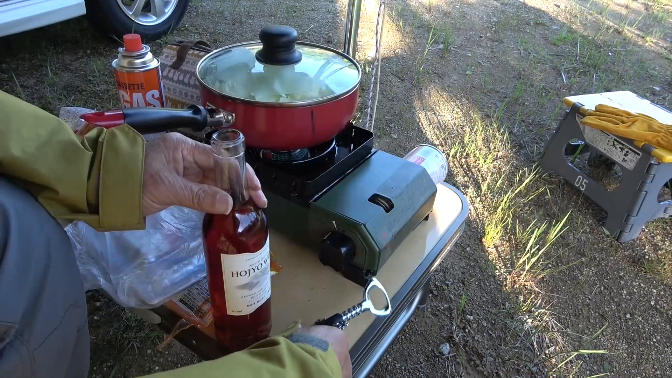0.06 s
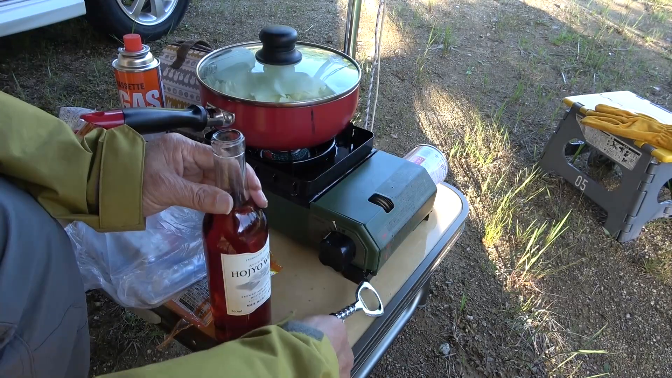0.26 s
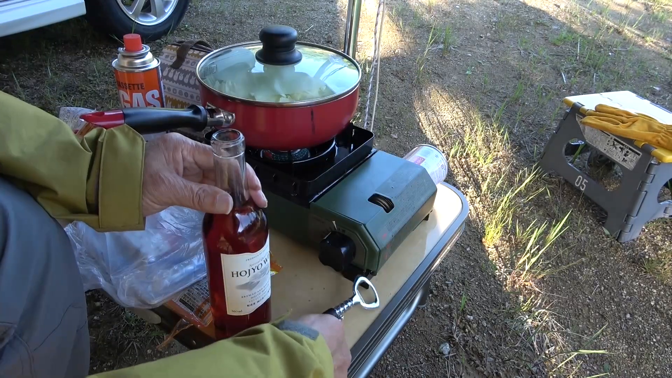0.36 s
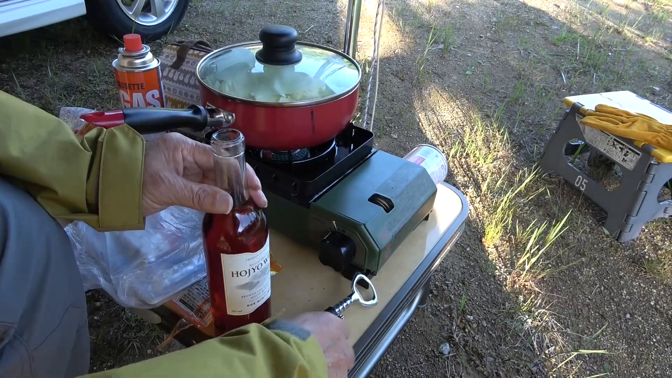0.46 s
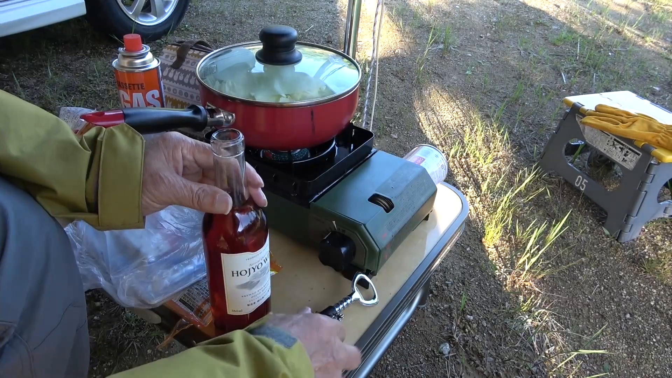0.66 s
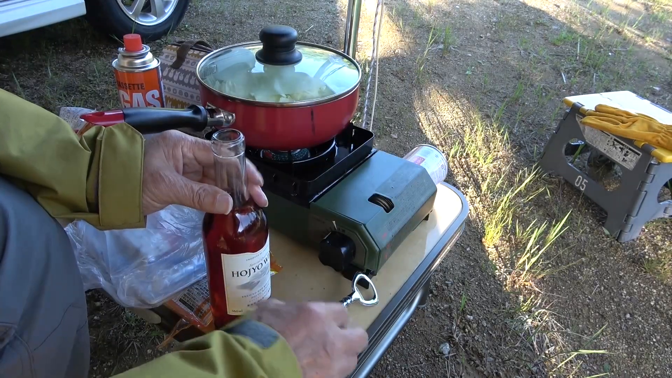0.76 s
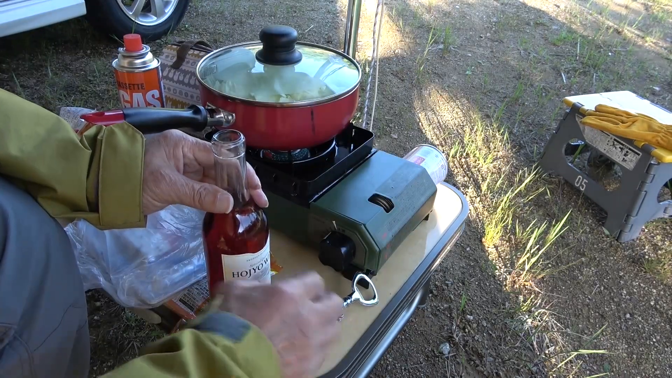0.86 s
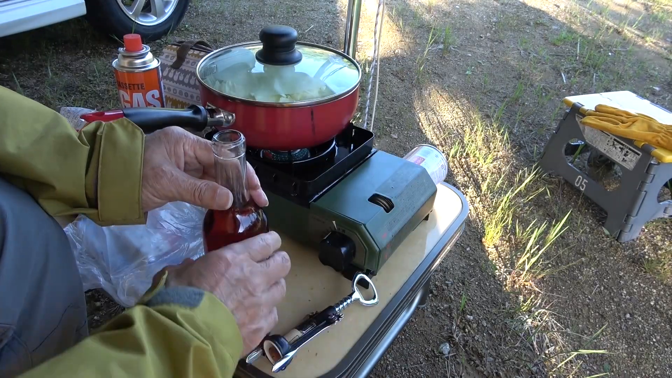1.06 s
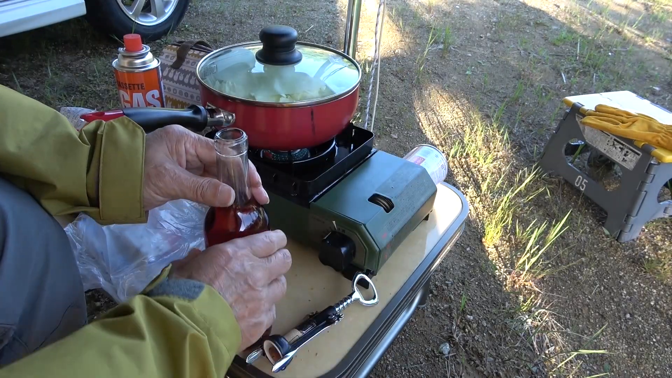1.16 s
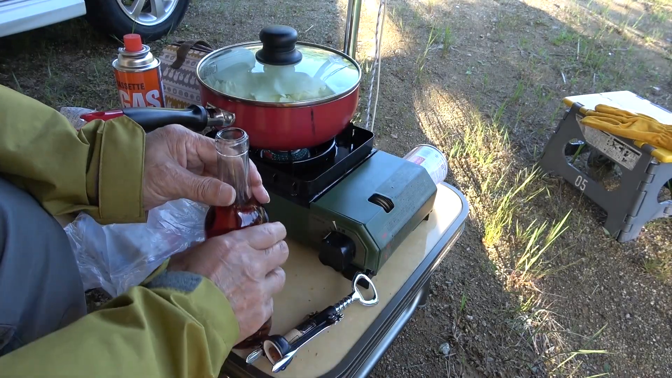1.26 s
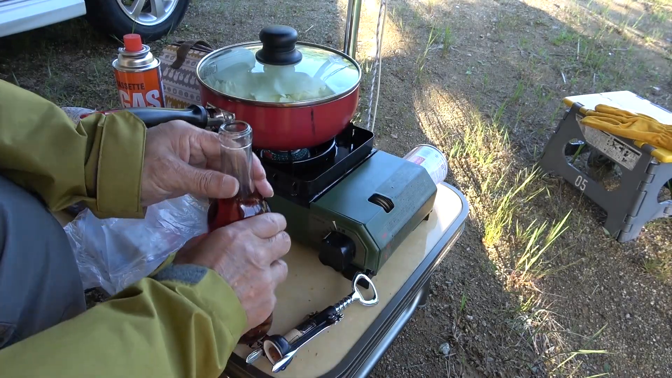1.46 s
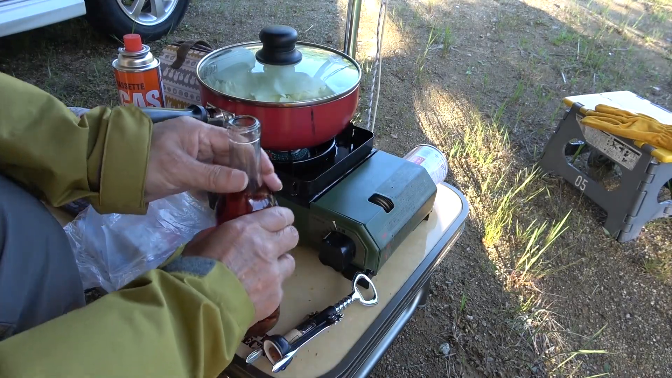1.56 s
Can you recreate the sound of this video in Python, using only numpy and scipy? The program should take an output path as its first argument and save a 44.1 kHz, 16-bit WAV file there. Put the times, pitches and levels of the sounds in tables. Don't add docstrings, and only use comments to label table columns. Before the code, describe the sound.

A steel corkscrew clatters onto a light camp table outdoors, bouncing and scraping to rest.

```python
import sys
import numpy as np
from scipy import signal
from scipy.fft import rfft, irfft
from scipy.io import wavfile
from scipy.ndimage import uniform_filter1d

SR = 44100
rng = np.random.default_rng(int(sys.argv[2]) if len(sys.argv) > 2 else 0)


def master_out(mix):
    frames = np.transpose(np.atleast_2d(mix))
    ceiling = np.clip(frames, -1, 1)
    pcm = np.round(ceiling * 32767).astype(np.int16)
    wavfile.write(sys.argv[1], SR, pcm)


def convert_level_to_amplitude(level_db):
    exponent = np.asarray(level_db, float) / 20
    return 10 ** exponent


N = 70560
t = np.arange(N) / SR


def unit(x):
    return x / np.sqrt(np.mean(x ** 2))


def read(table, hz):
    table = np.array(table)
    return np.interp(np.log(hz + 1), np.log(table[:, 0]), table[:, 1])


def colour(x, table, share=1):
    size = x.shape[-1]
    hz = np.arange(size // 2 + 1) * SR / size
    return irfft(rfft(x) * convert_level_to_amplitude(share * read(table, hz)), size)


def band(x, hz, width):
    return signal.lfilter(*signal.iirpeak(min(hz, .45 * SR), hz / width, fs=SR), x)


def fall(age, t60):
    return (age >= 0) * np.exp(-np.log(1000) * np.maximum(age, 0) / t60)


def swell_in(age, rise_s):
    return (1 - np.exp(-np.maximum(age, 0) / rise_s)) ** 2


def walk(rate, size=N):
    k = int(SR / rate)
    steps = np.repeat(rng.standard_normal(size // k + 1), k)
    return unit(uniform_filter1d(uniform_filter1d(steps, k), k)[:size])


# pitch_hz, level_db
AIR_PAN = [(60, .5), (200, 5.5), (450, 5), (800, 3), (2400, 4), (4500, 8), (7000, 3), (11000, 2)]
KNOCK_PAN = [(60, 1), (250, 3), (1300, 2), (2400, 1), (4400, 4.5), (6500, 0.5), (8100, 1), (11000, 0.5)]


def ports(mid, side, pan):
    return np.array([colour(mid + side, pan, .5), colour(mid - side, pan, -.5)])


# pitch_hz, level_db
AIR = [(20, -15), (130, -1.5), (330, 2.5), (480, -2), (650, -10.5), (1700, -21.5), (7500, -30),
       (14500, -33)]
AIR_SIDE = [(20, -36), (150, -22), (400, -19), (1100, -12), (4600, -36), (6500, -11), (10800, -18),
            (12000, -28)]
# pitch_hz, width_hz, level_db
WHINE = [(8300, 240, -67.5), (9400, 200, -76), (11600, 200, -78), (12700, 200, -77)]


def air():
    flicker_db, swell_db, hiss_db = 1.3, .5, .24
    air_db, side_db = -44.5, -65
    mid, swell = colour(rng.standard_normal(N), AIR), walk(2.0)
    low = signal.lfilter(*signal.butter(2, 700, fs=SR), mid)
    hum = low * convert_level_to_amplitude(flicker_db * walk(14.3) + swell_db * swell)
    hiss = (mid - low) * convert_level_to_amplitude(hiss_db * walk(3.7))
    mid = convert_level_to_amplitude(air_db) * unit(hum + hiss)
    for hz, width, db in WHINE:
        whine = unit(band(band(rng.standard_normal(N), hz, width), hz, width))
        mid = mid + convert_level_to_amplitude(db + 2 * walk(12.0)) * whine
    return mid, convert_level_to_amplitude(side_db) * unit(colour(rng.standard_normal(N), AIR_SIDE))


# start_s, share (0-1), level_db
LEAN = [
    (0, .2, -2),
    (.6, .3, -1),
    (1., 1, 0),
    (1.6, 1, 0),
]


def lean(mid, side):
    s, share, db = np.array(LEAN).T
    share = np.clip(np.interp(t, s, share), 0, 1)
    both = share * ports(mid, side, AIR_PAN) + (1 - share) * ports(mid, side, KNOCK_PAN)
    return convert_level_to_amplitude(np.interp(t, s, db)) * both


# start_s, level_db
SLEEVE = [
    (0, -56),
    (.5, -60.5),
    (.8, -56.5),
    (1.1, -57),
    (1.45, -55),
    (1.5, -54),
    (1.535, -48),
    (1.56, -44.5),
    (1.6, -45),
]
# pitch_hz, level_db
SLEEVE_COLOUR = [(500, 2.5), (1300, 2), (2600, 0.5), (3500, -1), (4700, -2.5), (8000, -5), (15000, -25)]


def sleeve():
    s, db = np.array(SLEEVE).T
    crackle = rng.standard_normal(N) * convert_level_to_amplitude(1.9 * walk(300))
    return convert_level_to_amplitude(np.interp(t, s, db)) * unit(colour(crackle, SLEEVE_COLOUR))


# pitch_hz, level_db, t60_s
BODY = [(892, -22.5, 0.19), (1034, -4.5, 0.12), (1164, -8, 0.11), (1173, 10, 0.032), (1644, -4, 0.1),
        (1900, 3, 0.037), (2100, -2, 0.035), (2450, -10, 0.078), (2540, -31, 0.06), (2925, -0.5, 0.058),
        (3410, -6, 0.083), (4124, -4.5, 0.05), (5300, -12, 0.017), (6270, -8, 0.015)]
# pitch_hz, level_db
SCATTER = [(650, 2.5), (1100, -23), (1500, -9.5), (2600, 1), (4000, -5.5), (7000, -18.5), (11000, -33),
           (15000, -54)]
# pitch_hz, t60_s
SCATTER_T60 = [(500, 0.097), (2500, 0.093), (6000, 0.09), (13000, 0.091)]


def steel_ring(a, db, hz):
    hold_cycles, ring_cycles = 1.87, 12
    push_cycles = np.clip(.1 - .24 * db, .1, hold_cycles)
    decay = fall(np.maximum(a * hz - hold_cycles, 0), ring_cycles)
    return -np.sin(2 * np.pi * hz * a) * np.clip(a * hz / push_cycles, 0, 1) * decay


def contact_tick(a, noise, tick_db):
    hz, t60_s, rise_s = 4750, .016, .00058
    tick = unit(band(band(noise, hz, 1.08 * hz), hz, 1.06 * hz))
    return tick * fall(a, t60_s) * convert_level_to_amplitude(tick_db) * np.clip(a / rise_s, 0, 1)


def body_modes(a):
    spread_db, rise_s = 2.5, .006
    body = 0
    for (hz, db, t60), c in zip(BODY, rng.standard_normal((len(BODY), 3))):
        tone = np.sin(2 * np.pi * hz * (1 + 0.011 * c[1]) * a + 3 * c[2])
        body = body + convert_level_to_amplitude(db + spread_db * c[0]) * tone * fall(a, t60)
    return body * np.clip(a / rise_s, 0, 1) ** 2


def scattered_echo(a, noise, hz, tick_db, scatter_db):
    own_pitch_db, bright_per_tick_db, rise_s = 1, .4747, .007
    source = unit(colour(noise, SCATTER)) + convert_level_to_amplitude(own_pitch_db) * unit(band(noise, hz, 0.15 * hz))
    echo = 0
    for f in 500 * 2. ** np.arange(0, 5.5, .5):
        part = band(band(source, f, 0.69 * f), f, 1.054 * f) * fall(a, read(SCATTER_T60, f))
        echo = echo + part * convert_level_to_amplitude(bright_per_tick_db * (tick_db + 9.5) * max(np.log2(f / 3000), 0))
    return echo * swell_in(a, rise_s) * convert_level_to_amplitude(scatter_db)


def strikes(table):
    body_db, echo_wide, tick_wide = -18.5, .5, .31
    side_tone = [(1500, -47), (5200, -15), (6800, 1), (10500, -3)]  # Hz, dB
    age = np.arange(8820) / SR
    out = np.zeros((2, N + len(age)))
    for s, db, hz, tick_db, scatter_db in table:
        noise = rng.standard_normal((4, len(age)))
        a = age - s * SR % 1 / SR
        noise[1:3] *= convert_level_to_amplitude(1.5 * walk(400, len(age)))
        tick = contact_tick(a, noise[[0, 3]], tick_db)
        echo = scattered_echo(a, noise[1:3], hz, tick_db, scatter_db)
        body = convert_level_to_amplitude(body_db + scatter_db + 11.5) * body_modes(a)
        i = int(s * SR)
        out[0, i:i + len(age)] += convert_level_to_amplitude(db) * (steel_ring(a, db, hz) + tick[0] + body + echo[0])
        out[1, i:i + len(age)] += convert_level_to_amplitude(db) * colour(echo_wide * echo[1] + tick_wide * tick[1], side_tone)
    return out[:, :N]


# start_s, level_db, pitch_hz, tick_db, scatter_db
KNOCKS = [(.0605, -36, 1220, -22, -10), (0.0612, -37.5, 3220, -6.5, -11), (0.1136, -23.5, 1044, -6.5, -7.5),
          (.1175, -31, 1200, -6, -2), (.1215, -24.5, 1040, -10, -27), (.2088, -3, 1154, -20, -7.5),
          (.2107, -11, 1140, -10, -13), (.2092, -6, 2250, -22, -40), (.2138, -4.5, 2510, -7, -6.5),
          (.217, -15, 1060, -25, -6), (.349, -16, 2200, -12, -13), (.363, -27.5, 2100, -37, -5),
          (0.4044, -5.5, 2087, -16, -13), (.4065, -14.5, 1040, -23, -5), (0.4094, -15, 2200, -38, -15.5),
          (0.2262, -35, 1210, -16, -10), (.4543, -8.5, 1108, -16, -10.5), (.4561, -17, 1108, -26, -32),
          (0.4623, -19, 1900, -24, -18.5), (.567, -31.5, 1170, -14, -14.5), (0.616, -54, 5500, -22.5, -16),
          (.669, -41.5, 1140, -26, -2.5), (0.693, -34.5, 1125, -15.5, -7.5), (0.699, -43, 2980, -24, -8)]


def knocks():
    return strikes(KNOCKS)


# start_s, level_db, pitch_hz, tick_db,
# scatter_db
MORE_KNOCKS = [(.2045, -35, 2680, 0, -18), (.2074, -32, 1280, -6, -27), (.2131, -10, 2810, 0, -17),
               (.2149, -21, 5700, -9.5, -14), (.2193, -14, 3000, -19, -28), (.2200, -14, 8300, -16, -17),
               (.2226, -15, 3180, -11, -29), (.2248, -28, 2330, -17, -25), (.2312, -16, 3030, -8, -34),
               (.2362, -18, 3570, -18, -9), (.2630, -29, 3100, -16, -22), (.2136, -21, 11000, -12, -27),
               (.2250, -41, 11800, -10, -25), (.3515, -24, 3020, -20, -15), (.3560, -27, 2910, -20, -20),
               (.4180, -24, 2150, -18, -24), (.3735, -29, 2240, -14, -16), (.4660, -22, 1990, -17, -29),
               (.6150, -50.5, 5000, -4, -20), (1.3985, -44, 2360, -5, -11), (.3495, -40, 12000, -4, -10),
               (.4046, -25, 6300, -12, -20), (.4050, -20, 3300, -18, -24), (.2095, -15, 1750, -24, -20),
               (.1150, -37, 5000, -10, -16)]


def more_knocks():
    return strikes(MORE_KNOCKS)


# start_s, level_db, brightness_db
DRAG = [
    (.16, -67, -36),
    (0.191, -45.5, -14),
    (0.261, -48.5, -4),
    (0.301, -41, -12.5),
    (.33, -38.5, -3),
    (0.372, -44, -7),
    (0.402, -44.5, -39),
    (.5, -47.5, -28),
    (.6, -58.5, -25),
]


def drag():
    s, db, bright_db = np.array(DRAG).T
    grit = rng.standard_normal(N) * convert_level_to_amplitude(1.2 * walk(270))
    low = unit(sum(convert_level_to_amplitude(d) * band(grit, f, 85.0) for f, d, _ in BODY[1:3]))
    top = unit(band(grit, 231, 57.0) + 1.4 * band(grit, 502, 32.0))
    high = unit(band(band(grit, 1980, 1050.0), 1970, 1400.0))
    scrape = low + convert_level_to_amplitude(-6) * top + convert_level_to_amplitude(np.interp(t, s, bright_db)) * high
    return convert_level_to_amplitude(np.interp(t, s, db)) * np.clip((s[-1] - t) * 20 + 1, 0, 1) * scrape


def modes(table, rise_s):
    return sum(convert_level_to_amplitude(db) * np.sin(2 * np.pi * hz * (t - s)) * fall(t - s, t60) * swell_in(t - s, rise_s) * 2
               for s, db, hz, t60 in table)


# start_s, level_db, pitch_hz, t60_s
THUMPS = [(.216, -35, 520, 0.09), (0.2151, -29.5, 191.3, 0.14), (0.2192, -24, 267.7, .11),
          (.234, -23.5, 219, 0.06), (.256, -36.5, 272, 0.095), (0.3526, -31.5, 245.5, 0.085),
          (.4055, -34, 530, 0.055), (0.408, -23.5, 240, 0.1), (.375, -38, 235, .08),
          (.432, -30, 284, 0.094), (0.456, -28, 198, 0.091), (.47, -28, 264, 0.069),
          (0.4607, -27, 516, 0.042), (0.466, -39, 124, 0.14), (.21, -30.5, 383, 0.077),
          (.405, -39, 142, 0.095), (.877, -38.5, 163, 0.065), (.8795, -37, 330, 0.066),
          (0.487, -26, 221.4, 0.095), (0.5458, -33.5, 303, 0.073), (0.579, -40, 335, 0.045),
          (0.8793, -30, 250, 0.052), (1.301, -33.5, 361, 0.073)]


def thumps():
    return modes(THUMPS, .0057) * convert_level_to_amplitude(1.2 * walk(90.24))


# start_s, level_db, pitch_hz, t60_s
RINGS = [(.2110, -18, 1042, 0.062), (.2110, -24.5, 866, 0.096), (.2300, -26, 1027, 0.064),
         (.2620, -39, 1046, 0.3), (.2875, -36, 1183, 0.032), (.3100, -34, 1103, 0.06),
         (.3170, -38, 1200, .07), (.3250, -33, 1080, 0.043), (.3510, -30.5, 1210, 0.04),
         (.5670, -47, 4080, .015), (.5700, -36, 1146, 0.038), (.6940, -45, 1014, 0.079),
         (.6960, -44, 1202, 0.07), (.6970, -42, 3020, 0.048), (.7020, -48.5, 1655, 0.094)]


def rings():
    return modes(RINGS, .0033)


# start_s, length_s, pitch_hz, glide_hz_per_s, level_db
BIRD = [
    (1.15, .07, 6000, -1500, -65),
    (1.2, .07, 5680, 2500, -59),
    (1.285, .075, 5950, -1000, -59),
]


def bird():
    song = 0
    for s, length, hz, glide, db in BIRD:
        whistle = np.sin(2 * np.pi * (hz + glide * (t - s) / 2) * (t - s))
        song = song + convert_level_to_amplitude(db) * whistle * np.sin(np.pi * np.clip((t - s) / length, 0, 1))
    return song * convert_level_to_amplitude(3.0 * walk(150) - 1)


# start_s, level_db, pitch_hz, tick_db, scatter_db
SNAPS = [
    (1.2706, -42.5, 2410, -19, -22),
    (1.584, -38, 4700, -28, -15),
    (1.5885, -22.5, 2450, -16, -29),
    (1.5892, -24.5, 4840, -22, -24),
    (1.5945, -25, 4450, -17, -24),
]


def snaps():
    return strikes(SNAPS)


# pitch_hz, level_db
KNOCK_BASS = [(100, -30), (500, -10), (780, -6), (950, 0)]


def scene():
    air_mid, air_side = air()
    knock, knock_side = knocks()
    rattle, rattle_side = more_knocks()
    snap, snap_side = snaps()
    steel = colour(knock + rattle, KNOCK_BASS) + rings()
    table = ports(steel + thumps() + drag(), knock_side + rattle_side, KNOCK_PAN)
    return table + ports(sleeve() + snap, snap_side, AIR_PAN) + lean(air_mid + bird(), air_side)


def top_cut(x):
    return signal.sosfilt(signal.butter(12, 15990, fs=SR, output="sos"), x)


def record(dry):
    side_top_hz, quiet_top_hz, top_hz = 11050, 14800, 15900
    quiet, full_scale = convert_level_to_amplitude(-65) ** 2, .99
    hz, dry = np.arange(N // 2 + 1) * SR / N, np.clip(dry, -full_scale, full_scale)
    mid, side = rfft(dry[0] + dry[1]) / 2, rfft(dry[0] - dry[1]) / 2
    wide = irfft(side * (hz > side_top_hz) * (hz < quiet_top_hz), N)
    side = irfft(side * (hz < side_top_hz), N)
    side = side + convert_level_to_amplitude(-19) * wide * (uniform_filter1d(wide ** 2, size=1024) > quiet)
    mid = mid * (hz < top_hz)
    top = irfft(mid * (hz > quiet_top_hz), N)
    faint = 1. * (uniform_filter1d(top ** 2, size=512) < quiet)
    mid = irfft(mid, N) - top * uniform_filter1d(faint, size=256)
    return top_cut(np.array([mid + side, mid - side]))


dry = scene()
out = record(dry)
master_out(out)
```